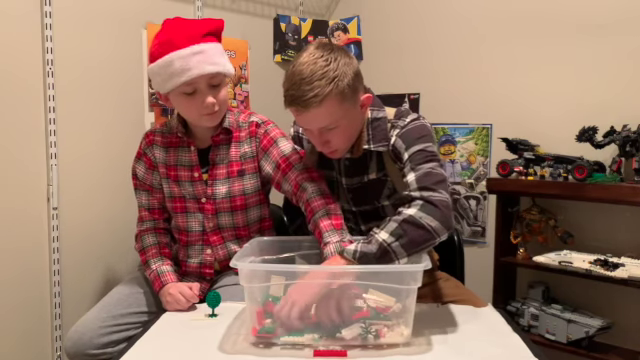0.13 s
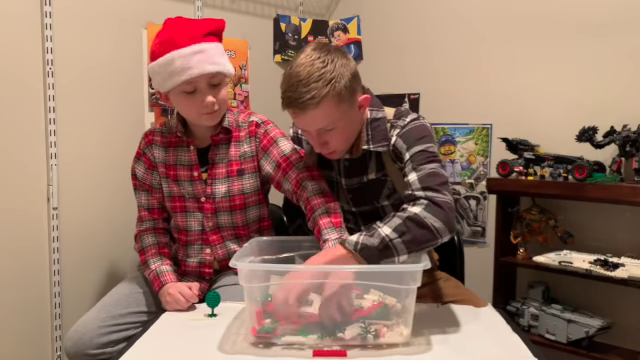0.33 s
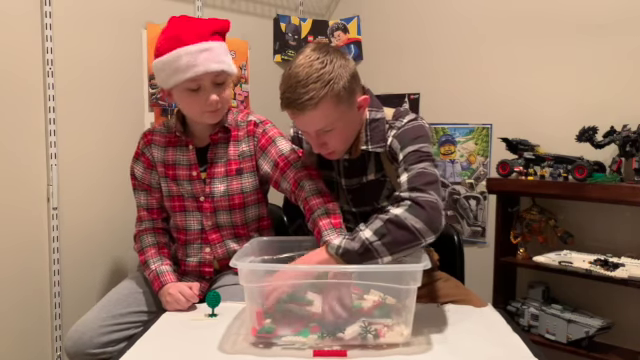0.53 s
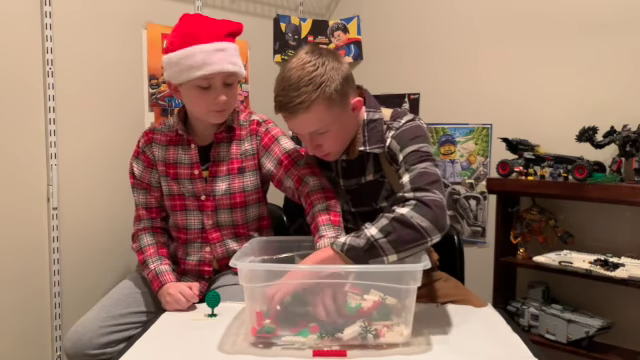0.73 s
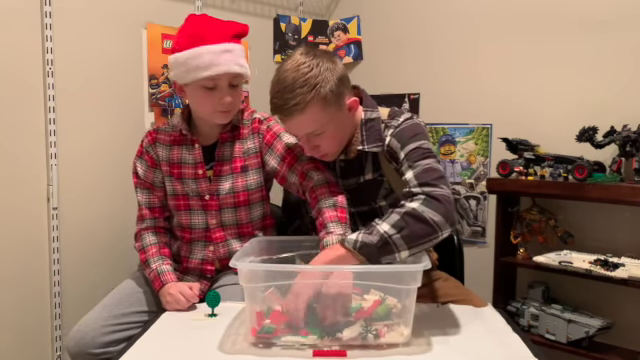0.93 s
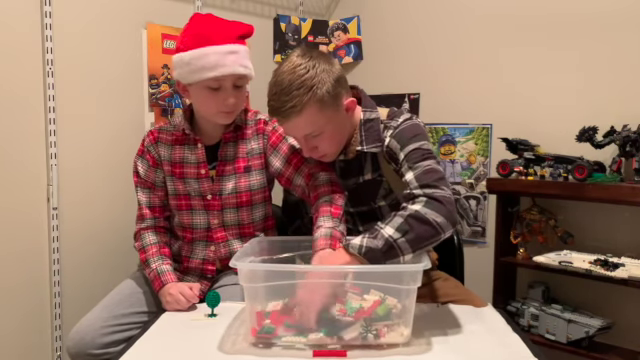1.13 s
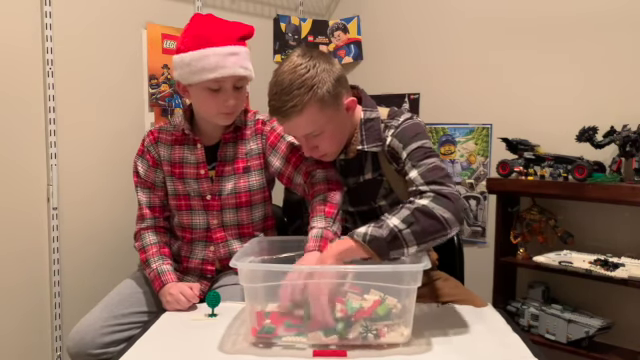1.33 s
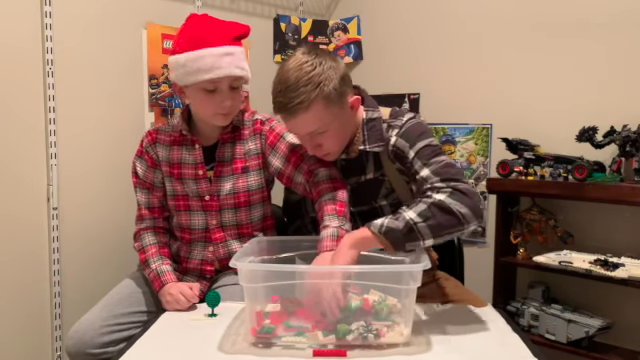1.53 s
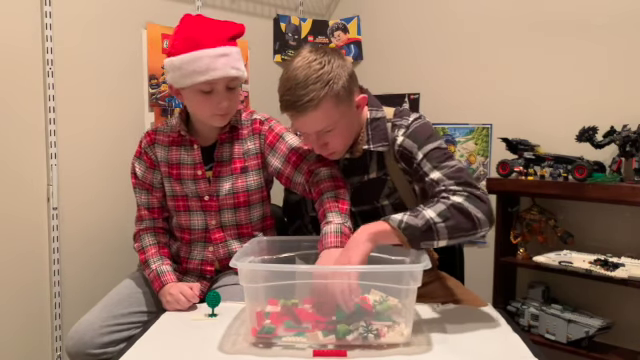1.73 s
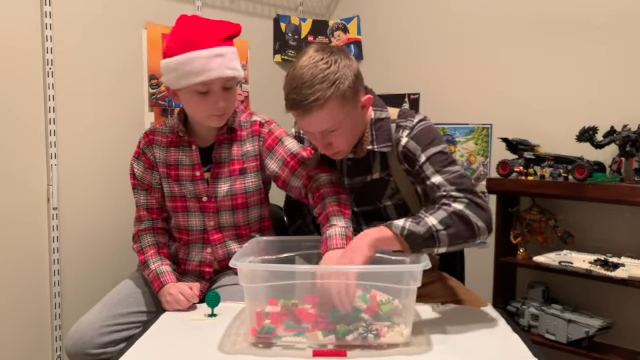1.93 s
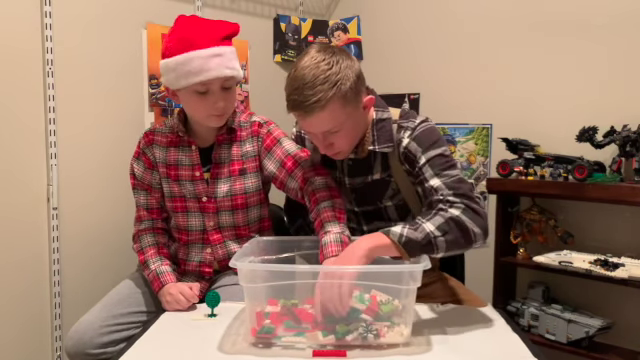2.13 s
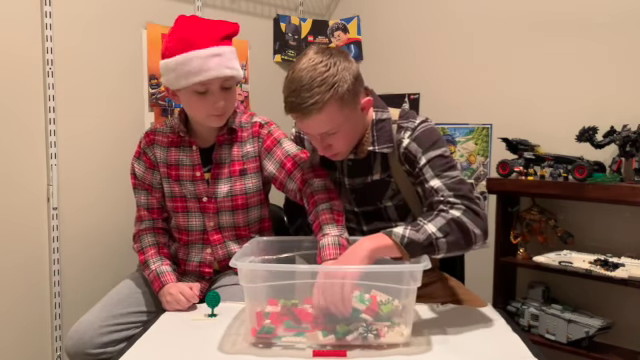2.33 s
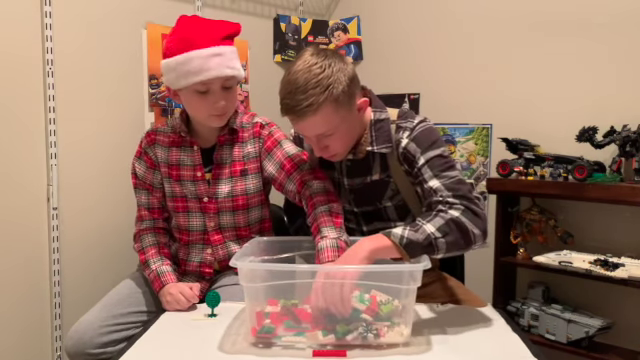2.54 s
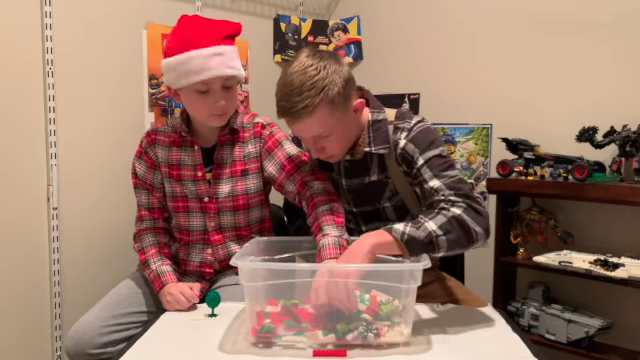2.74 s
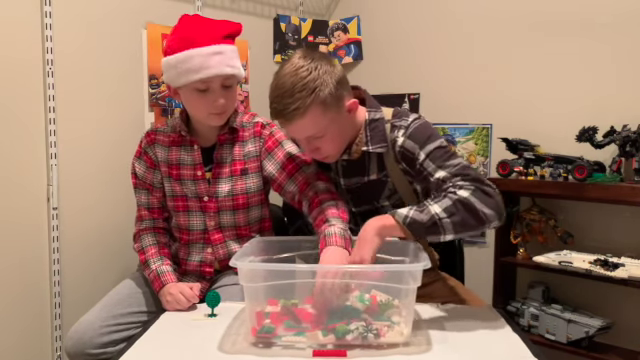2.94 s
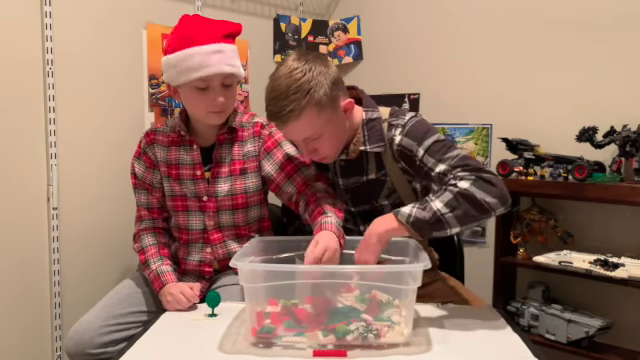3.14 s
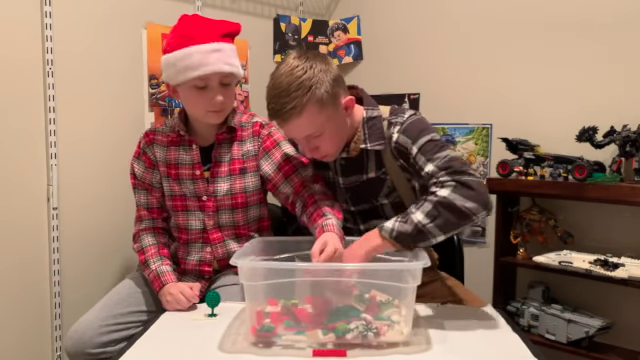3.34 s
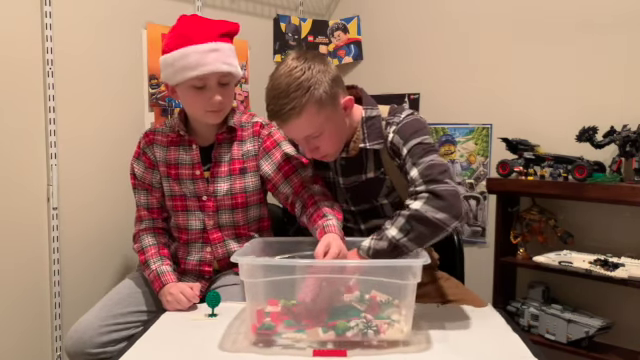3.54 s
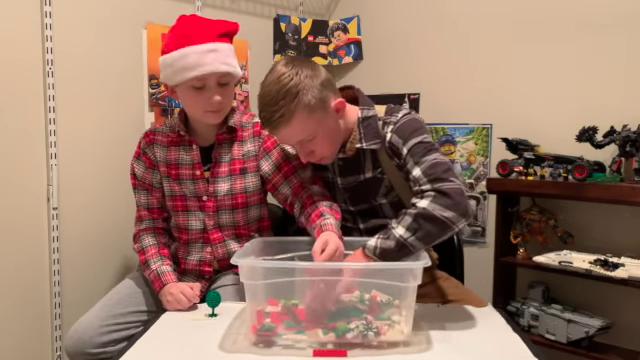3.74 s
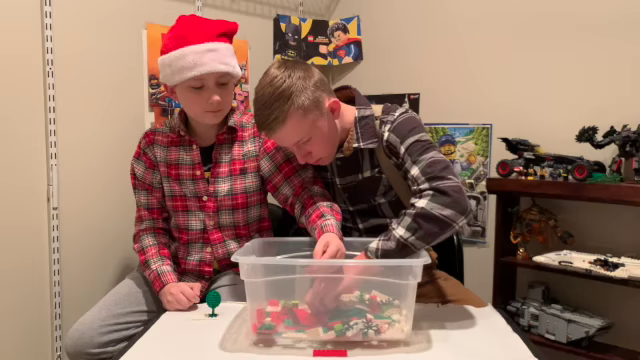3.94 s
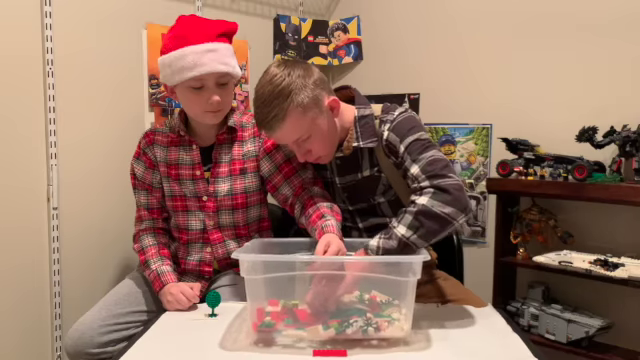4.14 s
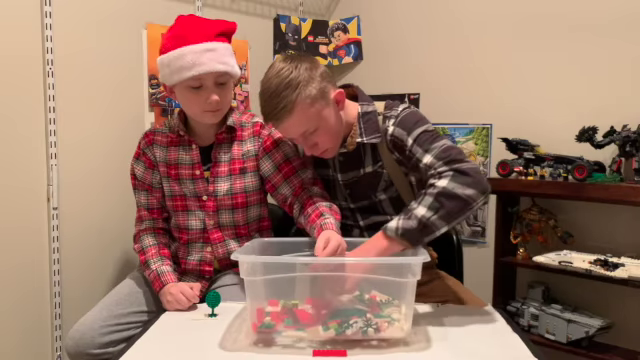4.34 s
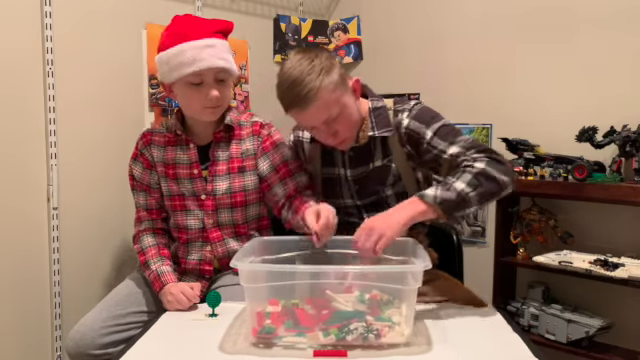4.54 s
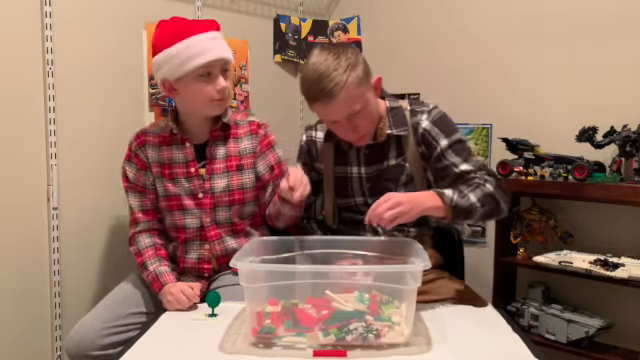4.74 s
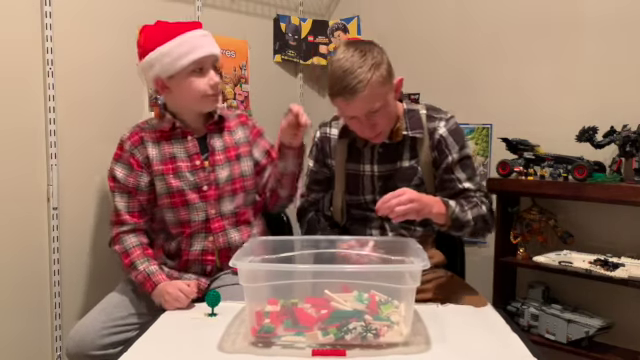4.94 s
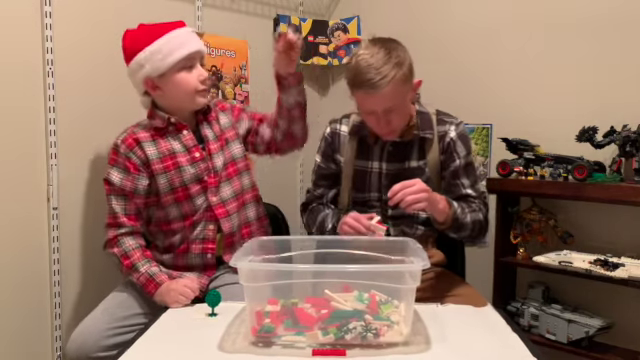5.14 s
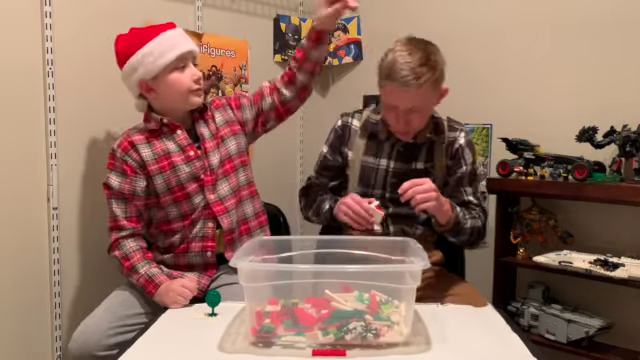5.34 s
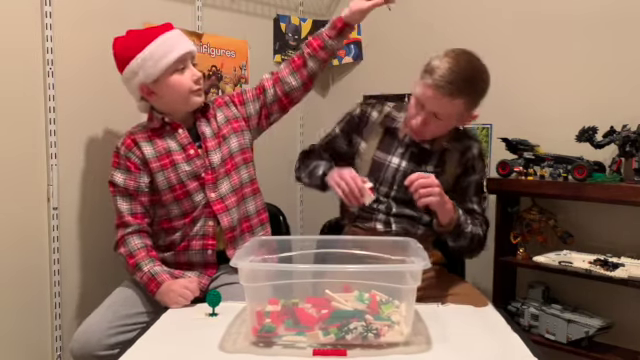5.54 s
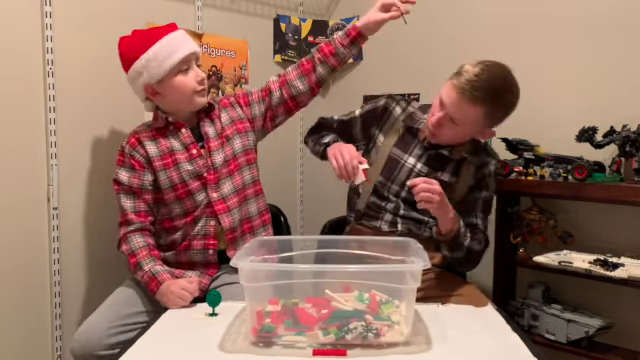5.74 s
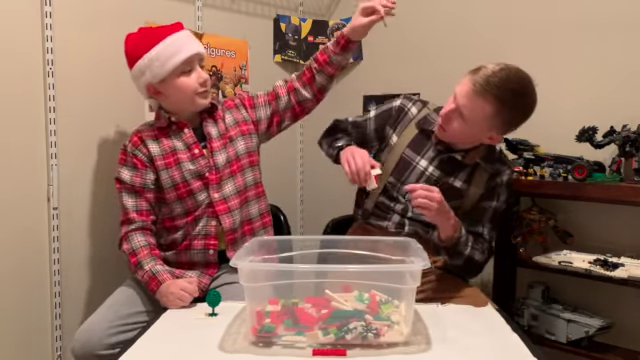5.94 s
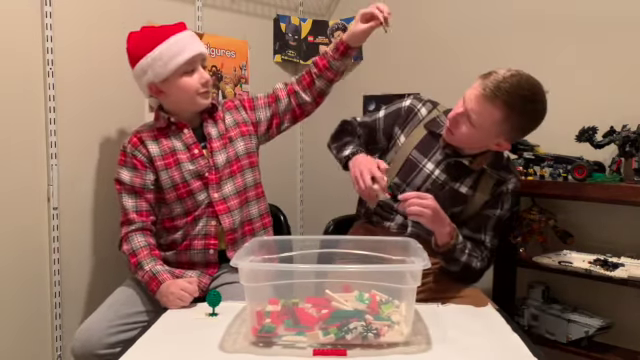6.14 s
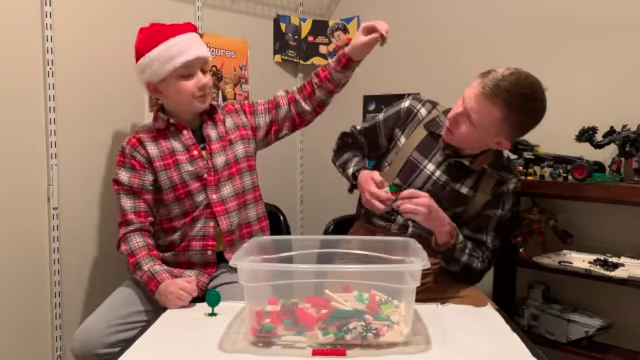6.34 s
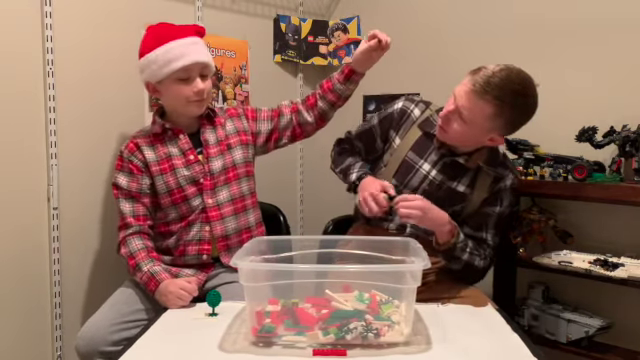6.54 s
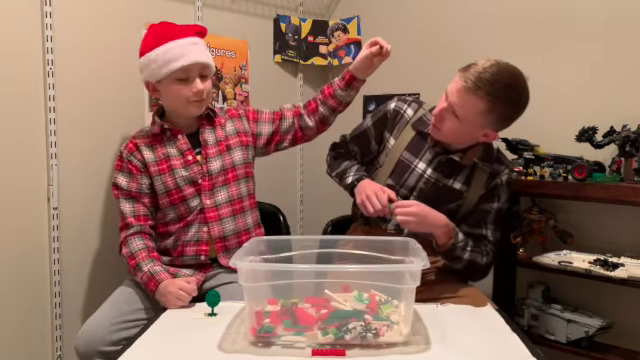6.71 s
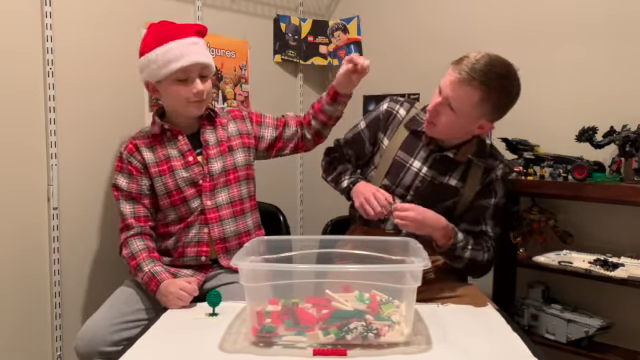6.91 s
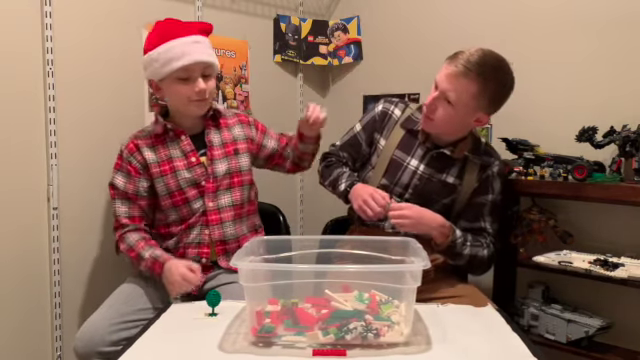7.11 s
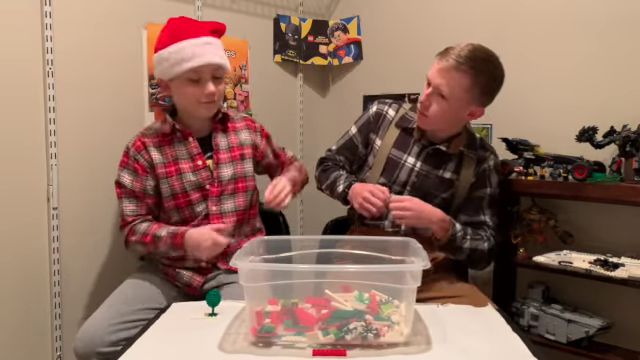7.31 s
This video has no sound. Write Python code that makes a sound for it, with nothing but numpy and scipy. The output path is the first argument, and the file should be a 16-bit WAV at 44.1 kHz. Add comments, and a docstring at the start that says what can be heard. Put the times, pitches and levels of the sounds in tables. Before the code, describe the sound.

In a small quiet room, close stereo microphones catch hands churning small hard plastic bricks in a hollow bin. Dense bright clatter comes first, with hollow drumming on the bottom, then thins into brief bursts and separate clicks. After about four and a half seconds the rattle stops; dull low bumps, faint cloth rustle, a stuttering creak and one hollow clack remain.

```python
"""Loose plastic bricks tick against each other and drum on a plastic bin, in bursts, in a small room.
Two hands rummage: showers of random contacts ring the bin's panels and the bricks, and listed knocks stand out.
Dull bumps on furniture sweep down to a boom; later come a stuttering creak of ringing slips, a hollow clack
and short rasps and clicks of filtered grains. Sleeves rustle, weight shifts rumble, and faint noise lies underneath."""
import sys
import numpy as np
from scipy import signal
from scipy.fft import rfft, irfft
from scipy.io import wavfile
from scipy.ndimage import uniform_filter1d

SR = 44100
rng = np.random.default_rng(int(sys.argv[2]) if len(sys.argv) > 2 else 0)


def pcm_store(signal):
    """Save signal as 16-bit PCM."""
    levels = np.round(np.clip(np.atleast_2d(signal), -1, 1) * 32767)
    wavfile.write(sys.argv[1], SR, levels.astype(np.int16).T)


N = 325001


def amp(db):
    """Amplitude factor of a level in dB."""
    return 10 ** (np.asarray(db) / 20)


def evened(x):
    """Scales a sound to RMS 1."""
    return x / np.sqrt(np.mean(x ** 2) + 1e-20)


def unit(x):
    """Scales a response to mean energy 1 per channel."""
    return x / np.sqrt(np.sum(x ** 2) / len(x) + 1e-20)


def read(points, hz):
    """Interpolates a table on a log-frequency axis."""
    f, value = np.transpose(points)
    return np.interp(np.log(hz + 1), np.log(f + 1), value)


def add(mix, s, sound):
    """Mixes a stereo sound in at s seconds."""
    part = mix[:, max(round(s * SR), 0):][:, :sound.shape[1]]
    part += sound[:, :part.shape[1]]


def shaped(x, points):
    """Gives a full-length sound a spectrum."""
    gain = amp(read(points, np.fft.rfftfreq(N, 1 / SR)))
    return irfft(rfft(x) * gain, N)


def coloured(x, points, size=2048):
    """Gives a hit a spectrum by a minimum-phase filter, with nothing ahead of its attack."""
    db = read(points, abs(np.fft.fftfreq(size, 1 / SR)))
    log_gain = np.log(amp(np.maximum(db, -100)))
    taps = np.fft.ifft(np.exp(np.conj(signal.hilbert(log_gain)))).real
    return signal.fftconvolve(x, taps[None], axes=1)[:, :x.shape[1]]


def band(x, lo_hz, hi_hz):
    """Third-order Butterworth band-pass."""
    sos = signal.butter(3, [lo_hz, min(hi_hz, SR / 2.1)], "band", fs=SR, output="sos")
    return signal.sosfilt(sos, x)


def strike(hz, db, t60, ring_db, scatter_db, scatter_t60, size=5000):
    """One contact: a tick, the modes it wakes at that spot, and the jostle of neighbouring parts."""
    t = np.arange(size) / SR
    weights = amp(db) * rng.standard_normal(len(hz))
    ring = weights @ np.sin(2 * np.pi * np.outer(hz, t)) * amp(-60 * t / t60)
    hit = (t == 0) + amp(ring_db) * unit(ring[None])[0]
    # samples; the bin stands a little to the right
    lags = rng.integers(0, 6), rng.integers(0, 2)
    hit = np.array([np.pad(hit, (lag, 0))[:size] for lag in lags])
    scatter = unit(rng.standard_normal((2, size)) * amp(-60 * t / scatter_t60))
    return hit + amp(scatter_db) * scatter


def ringing(modes, scale, t60, rise_s, size=9000):
    """Modes (pitch, dB) at pitch times scale that swell briefly and die away, with energy 1."""
    t = np.arange(size) / SR
    ring = sum(amp(db) * np.sin(2 * np.pi * (scale * pitch * t + rng.random())) for pitch, db in modes)
    envelope = amp(-60 * t / t60) * (1 - np.exp(-t / rise_s))
    return unit((ring * envelope)[None])[0]


def strokes():
    """The hands' force over time, with the power-weighted bottom weight and brightness of the strokes (dB)."""
    # Strokes of a hand through the bricks. Each row: start in seconds, length in seconds, mid-stroke force in dB,
    # swell over the stroke in dB, weight on the bottom in relative dB, brick-on-brick brightness in relative dB.
    stroke_rows = [(-.02, 0.13, -32, -9, -4.5, 0), (0.099, 0.18, -34, -4, -4.5, -2.5),
                   (0.328, 0.059, -48, 5.5, 11, -5), (0.384, 0.092, -39, 18, -4.5, -1),
                   (0.463, 0.082, -32.5, 10, -8, 0), (0.554, 0.14, -28.5, 0.5, -4, -0.5),
                   (0.695, 0.14, -32, -2.5, -1.5, -0.5), (0.855, 0.15, -39.5, 6.5, -1.5, -2),
                   (0.955, 0.25, -38.5, 1.5, -0.5, 0.5), (1.222, 0.2, -42, 5, 2.5, 2.5),
                   (1.303, 0.24, -33, 6, -2.5, 1), (1.57, 0.068, -41, -11, 7, 0.5),
                   (1.637, 0.34, -36, -8.5, -2, 0), (2.117, 0.059, -41.5, 1, -2.5, -3),
                   (2.334, 0.074, -61.5, -5, 1, -18), (2.407, 0.069, -52.5, -16, 0.5, -4.5),
                   (2.49, 0.046, -44, -2.5, -6, -5.5), (2.583, 0.081, -44, -9.5, -3, -3.5),
                   (2.705, 0.056, -62.5, -6, 10, -9), (2.787, 0.034, -55, -5, -8, -11),
                   (2.894, 0.017, -67, -2.5, -8, 0), (3.428, 0.23, -42, 5.5, -4.5, -2),
                   (3.621, 0.19, -44, -4, -0.5, -2.5), (3.802, 0.034, -47, 6, 3, 2),
                   (3.878, 0.15, -50.5, -14.5, -2.5, -8), (4.029, 0.095, -50, 2.5, -7.5, -4),
                   (4.288, 0.093, -52.5, -5.5, -23, -14), (4.349, 0.053, -42, 2, 0.5, -4),
                   (4.459, 0.044, -55, 8, 4.5, -8.5), (4.534, 0.035, -59, -11, 12, -2)]
    rise_s, settle_db_per_s = 0.011, 332.5
    t = np.arange(0, N, 32) / SR
    powers = []
    for start, length, force, swell, _, _ in stroke_rows:
        age = t - start
        db = force + swell * (np.clip(age / length, 0, 1) - .5)
        db = db - settle_db_per_s * np.maximum(age - length, 0)
        powers.append((np.clip(age / rise_s, 0, 1) * amp(db)) ** 2)
    total = np.sum(powers, 0) + 1e-20
    weight, bright = np.array(stroke_rows)[:, 4:].T @ np.array(powers) / total
    curves = 10 * np.log10(total), weight, bright
    return [np.interp(np.arange(N) / SR, t, curve) for curve in curves]


def contact(shell_scatter_db, brick_scatter_db, brick_ring_db, detune=0.037, colour_db=3.0):
    """How the bin's walls, its bottom and the low and high modes of one small brick answer a contact."""
    # Modes of the bin's panels before detuning. Each row: frequency in Hz, level in relative dB.
    bin_modes = [(312, -8.5), (395, 5.5), (452, 4.5), (544, 2), (653, 0.5), (833, -1.5), (892, -7),
                 (988, -9.5), (1092, -19), (1425, 7), (1616, -3), (1913, 4), (2286, -2.5)]
    # Mean spectrum of the filled bin. Each row: frequency in Hz, level in relative dB.
    clatter = [(60, -22.5), (150, -14), (200, -16), (250, -8.5), (335, -9), (400, -1.5), (452, 3),
               (495, -4), (544, 1.5), (600, -3), (652, -2), (730, -4), (850, -0.5), (1450, 0.5),
               (2200, -4.5), (3200, -16.5), (5600, -23.5), (8300, -18.5), (12000, -21), (15800, -26)]
    hz, db = np.transpose(bin_modes)
    hz = hz * (1 + detune * rng.standard_normal(len(hz)))  # the shifting load retunes the panels
    shell = strike(hz, db, t60=.05, ring_db=-18, scatter_db=shell_scatter_db, scatter_t60=.035)
    brick_hz = rng.uniform(3800, 13000, size=9)
    brick = strike(brick_hz, np.zeros(len(brick_hz)), t60=.04, ring_db=brick_ring_db,
                   scatter_db=brick_scatter_db, scatter_t60=.045)
    # no two bricks are alike
    colour = [(f, level + colour_db * rng.standard_normal()) for f, level in clatter]
    shell, brick = coloured(shell, colour), coloured(brick, colour)
    walls, bottom = band(shell, 660, 3200), band(shell, 63, 660)
    low, high = band(brick, 2800, 7000), band(brick, 7000, 19000)
    return np.array([unit(part) for part in (walls, bottom, low, high)])


def rummage(wall_db=-4, bottom_db=-4, brick_db=-6, tick_db=-6.5, variety_db=4.0, tick_growth=2.1):
    """A shower of contacts of uneven size, denser as the hands push harder."""
    contacts_per_s, spots, size_spread_db = 560, 110, 4.0  # the rate holds at -35.5 dB force
    t, out = np.arange(N) / SR, np.zeros((2, N))
    force, weight, bright = strokes()
    rate = contacts_per_s * np.clip(amp(.4 * (force + 35.5)), .4, 2)
    sizes = amp(size_spread_db * np.minimum(rng.exponential(1, N), 4)) * (rng.random(N) < rate / SR)
    # the hand's effort is shared among the contacts of each moment
    crowd = abs(uniform_filter1d(sizes ** 2, size=2000))
    sizes = sizes / np.sqrt(crowd + 0.00097) * amp(force)
    spot = rng.integers(0, spots, N)
    shares = variety_db * rng.uniform(-1.1, 1, (N, 4))  # some contacts favour the bin, others the bricks
    answers = [contact(shell_scatter_db=-1.5, brick_scatter_db=2, brick_ring_db=1) for _ in range(spots)]
    for i in np.flatnonzero((sizes > 0) & (force > -80)):
        part_db = np.array([wall_db, bottom_db + weight[i], brick_db + bright[i],
                            tick_db + tick_growth * bright[i]])
        hit = np.tensordot(amp(part_db + shares[i]), answers[spot[i]], 1)
        add(out, t[i], sizes[i] * hit)
    return out


def clacks(level_db=19, spread_db=0.5):
    """Larger pieces collide among the small ones: each a short hard click at a pitch of its own."""
    # Modes of a loose plate or large brick. Each row: multiple of its lowest mode, level in relative dB.
    piece_modes = [(1, 2), (1.27, -3), (1.55, -3), (1.9, -4.5), (2.4, -11), (3.1, -13.5), (3.9, -13.5)]
    low_hz, high_hz, clacks_per_s = 790, 2594, 75  # lowest mode of the largest and smallest pieces
    out, force = np.zeros((2, N)), strokes()[0]
    for i in np.flatnonzero((rng.random(N) < clacks_per_s / SR) & (force > -52)):
        hz = low_hz * (high_hz / low_hz) ** rng.random()
        ring = ringing(piece_modes, hz, t60=.011, rise_s=.00005, size=900)
        sides = rng.uniform(.5, 1.3, (2, 1))
        level = amp(force[i] + level_db + spread_db * min(rng.exponential(), 2))
        add(out, i / SR, sides * level * ring)
    return band(out, 400, 15000)


def knocks(wall_db=26.0, bottom_db=24, brick_db=24.5, tick_db=19.0, slide_db=-2, tick_growth=2.7, size=560):
    """Single contacts that stand out of the rattle: gentle ones slide into place, hard ones strike cleanly."""
    # Bricks that strike the bin or snap. Each row: time in seconds, force in relative dB,
    # weight on the bottom in relative dB, brightness in relative dB.
    knock_rows = [(.021, -39.5, -15, -13.5), (0.069, -30.5, -0.5, -7.5), (0.142, -40, -2, -14.5),
                  (.225, -24.5, -2, -4), (0.267, -31.5, -14, -7.5), (0.422, -42.5, 1.5, -6.5),
                  (0.488, -34, -1, 3.5), (.578, -30.5, -3, -4.5), (.594, -28, 0.5, -9.5),
                  (.602, -27, -2.5, -9), (0.652, -28.5, -8, -4.5), (0.72, -35, -10, -11),
                  (0.729, -25.5, -1.5, -12), (0.78, -29, 3, -16.5), (.97, -38, -3, -4),
                  (1.039, -34.5, -4, -4), (1.075, -53, -5, 8.5), (1.087, -41, -5, -3.5),
                  (1.096, -35.5, -12, -9), (1.13, -40, -3, -5.5), (1.154, -26, -7.5, -4.5),
                  (1.259, -28, -6, -8), (1.293, -36.5, -9, -7.5), (1.314, -36, 4.5, -6),
                  (1.326, -30, 5, -5), (1.359, -37.5, 5, 2), (1.372, -26, -3, -10.5), (1.418, -32, -6, 2),
                  (1.555, -36, -1, -7), (1.676, -36.5, 8.5, -4.5), (1.685, -34, 2, 5), (1.76, -42, 9, -6),
                  (1.892, -31, -11, -10), (1.965, -38, -20, -2), (2.117, -43, -5, -6),
                  (2.13, -50.5, -8, -5), (2.14, -40, -4, -3), (2.405, -52, -3, -18),
                  (2.416, -48.5, -3, -13), (2.487, -47.5, -10, -4), (2.508, -50, 1, -10),
                  (2.55, -44, -1, -25), (2.6, -40.5, -15, -21), (2.619, -38, -4, -6.5),
                  (2.643, -41, -5, -3.5), (2.802, -61, -5, -19), (2.81, -45.5, 2, -11),
                  (2.9, -61.5, -1.5, -2), (3.416, -57, -5, 2), (3.433, -53.5, 8, 4.5),
                  (3.443, -41, 8.5, -5), (3.463, -38.5, 2.5, -7), (3.506, -42, -9, -12),
                  (3.549, -43.5, 5, -5), (3.56, -42, 4, -8), (3.577, -41, -2, 2), (3.628, -36.5, -3, -14.5),
                  (3.644, -35, 5.5, -0.5), (3.658, -36.5, -3, -12), (3.678, -40, 2, -6),
                  (3.73, -43.5, -5, 0.5), (3.775, -38.5, -6, -10), (3.803, -31, -13, -13.5),
                  (3.826, -28, -1.5, -5), (4.035, -56, -5, -13), (4.044, -48.5, 4, -11),
                  (4.054, -36.5, -10, -5), (4.079, -32.5, -13.5, -2), (4.302, -48.5, -6.5, -19),
                  (4.322, -46.5, -11, -26), (4.347, -51, 4, -9), (4.356, -35, -5, -13),
                  (4.484, -51.5, -3, -10), (4.535, -49, 5, -7), (4.723, -66.5, -14, -0.5),
                  (4.895, -65, 4.5, -24), (4.966, -63.5, -9, -0.5), (5.034, -70, -6, 1),
                  (5.643, -58.5, 6, -1.5), (6.012, -64, 11.5, -19)]
    out, lead = np.zeros((2, N)), np.arange(-size, 1) / SR
    for s, force, weight, bright in knock_rows:
        part_db = force + np.array([0, weight, bright, tick_growth * bright])
        part_db = part_db + np.array([wall_db, bottom_db, brick_db, tick_db])
        answer = contact(shell_scatter_db=-5, brick_scatter_db=5, brick_ring_db=-2, detune=.02, colour_db=1.5)
        hit = np.tensordot(amp(part_db), answer, 1)
        slide = unit(rng.standard_normal((1, len(lead))) * np.exp(lead / .004))
        touch = unit((lead == 0) + amp(slide_db - 0.12 * (force + 66.5)) * slide)
        add(out, s + lead[0], signal.fftconvolve(hit, touch, axes=1))
    return out


def drums(body_db=22, rise_s=0.0033):
    """The bottom of the bin answers a push with a short hollow note, which depends on what lies on it."""
    # Bumps by a hand or the whole load. Each row: time in seconds, level in relative dB, note in Hz, t60 in seconds.
    drum_rows = [(.354, -40, 395, .05), (.374, -29, 403, 0.031), (1.315, -30, 445, 0.098),
                 (1.581, -33, 526, 0.087), (1.654, -30, 459, 0.08), (1.764, -25.5, 437.6, 0.27),
                 (1.914, -28, 445, 0.099), (2.675, -45.5, 552, 0.14), (2.735, -54, 559, 0.13),
                 (3.826, -29, 638, 0.056), (4.353, -22.5, 445, 0.038), (4.4, -30.5, 418.6, .1),
                 (4.475, -44, 401, 0.09), (4.534, -33, 500, 0.065)]
    # Modes of the bottom. Each row: multiple of the note, level in relative dB.
    drum_modes = [(.55, -11.5), (1, 0.5), (1.25, -8), (2.3, -17)]
    out = np.zeros((2, N))
    for s, peak, hz, t60 in drum_rows:
        note = ringing(drum_modes, hz, t60, rise_s)
        add(out, s, amp(peak + body_db) * np.tile(note, (2, 1)))
    return out


def bumps(start_hz=430, glide_s=0.0094, knock_db=-3, rattle_db=-12, echo_db=-12, echo_glide_s=0.041,
          boom_rise_s=.03, shudder_db=-8):
    """Bending waves in a board: high ones arrive first and fall to a boom; the far edge's echo falls more slowly."""
    # Dull bumps on the furniture. Each row: time in seconds, knock level in relative dB, boom level in relative dB,
    # boom note before its sag in Hz, boom t60 in seconds.
    bump_rows = [(1.686, -24, -36.5, 172, 0.16), (1.92, -35, -44, 110, 0.23),
                 (4.163, -26.5, -32.5, 116, .12), (4.353, -27, -32, 94.9, 0.094),
                 (4.405, -37, -36, 85, 0.32), (4.817, -37.5, -44.5, 128, 0.27),
                 (5.102, -41, -44.5, 130, 0.17), (6.268, -36.5, -41.5, 140, 0.16),
                 (6.416, -45.5, -51.5, 140, .15), (7.172, -31.5, -41, 125, .16),
                 (7.302, -40, -45, 139.4, 0.34)]
    sag_octaves_per_s = 1.8  # the slowest, lowest waves arrive last
    t, out = np.arange(SR // 2) / SR, np.zeros((2, N))

    def falling(end_hz, glide):
        """A sine that glides from the knock to the sagging boom."""
        hz = end_hz * 2 ** (-sag_octaves_per_s * t) + (start_hz - end_hz) * np.exp(-t / glide)
        return np.sin(2 * np.pi * np.cumsum(hz) / SR)

    for s, peak, boom, end_hz, t60 in bump_rows:
        direct, echo = falling(end_hz, glide_s), falling(end_hz, echo_glide_s)
        front = amp(peak + knock_db - 60 * t / 0.044) * (1 - np.exp(-t / 0.0029))
        tail = amp(boom - 60 * np.maximum(t - boom_rise_s, 0) / t60) * np.minimum(t / boom_rise_s, 1) ** 2
        shudder = evened(band(rng.standard_normal(len(t)), 60, 170))
        rattle = evened(band(rng.standard_normal(len(t)), 180, 580))
        rattle_level = amp(peak + knock_db + rattle_db - 60 * t / 0.49) * (1 - np.exp(-t / 0.0034))
        wave = (front + tail) * direct + tail * (amp(echo_db) * echo + amp(shudder_db) * shudder)
        wave += rattle_level * rattle
        add(out, s, np.array([wave, wave]))
    return out


def creaks(body_db=13, ring_db=15, ring_t60=0.028, ring_rise_s=0.0029):
    """A joint sticks and slips in a stutter; each slip is a dull knock that sets the frame ringing."""
    # Slips. Each row: time in seconds, level in relative dB, edge in dB relative to that level.
    slip_rows = [(4.746, -50, 2), (5.314, -50, 5.5), (5.553, -53.5, 10), (5.604, -50.5, 12),
                 (5.642, -40.5, 8), (5.692, -40, 6.5), (5.743, -42, 9), (5.799, -39.5, 4.5),
                 (5.891, -46.5, -3), (5.902, -42, -3), (6.01, -45, 10.5), (6.058, -43, 5),
                 (6.979, -42, 10.5), (7.049, -46, 5), (7.058, -45, -3.5), (7.109, -43, -2.5),
                 (7.158, -38, 1), (7.236, -42, 1), (7.286, -45, 0.5), (7.308, -42, 4), (7.355, -43, 6)]
    # Spectrum of a slip. Each row: frequency in Hz, level in relative dB.
    slip_colour = [(59, -29), (100, 0), (167, -10), (241, 0), (540, -16), (592, -17.5), (903, -5.5),
                   (2140, -14.5), (2810, -29), (8000, -52), (10400, -48), (17600, -120)]
    # Frame modes before a random retuning. Each row: frequency in Hz, level in relative dB.
    frame_modes = [(390, 2.5), (545, 2.5), (660, -5.5), (1080, -19)]
    out = np.zeros((2, N))
    for s, peak, edge in slip_rows:
        slip = strike(np.array([380, 540, 620]), np.zeros(3), t60=0.029, ring_db=-13.5,
                      scatter_db=9.5, scatter_t60=0.041)
        slip = coloured(slip, slip_colour)
        body = amp(peak + body_db) * unit(band(slip, 84, 476))
        add(out, s, body + amp(peak + edge) * unit(band(slip, 450, 5300)))
        ring = ringing(frame_modes, rng.uniform(.93, 1.07), ring_t60, ring_rise_s)
        add(out, s, amp(peak + ring_db) * np.tile(ring, (2, 1)))
    return out


def clack(level_db=-47, rise_s=0.0029, rasp_db=-13, rasp_t60=.09):
    """A hollow piece of furniture, knocked once, rings and rasps briefly."""
    # Its modes. Each row: frequency in Hz, level in relative dB, t60 in seconds.
    hollow_modes = [(364, 13, 0.064), (568, -3.5, 0.062), (1007, -1, 0.076), (1240, -2, 0.048),
                    (1670, -5.5, 0.055), (1870, -12, 0.05), (2780, -21, 0.06), (3300, -23, 0.06),
                    (3838, -22, 0.07)]
    clack_s = 6.266
    t, out = np.arange(SR // 3) / SR, np.zeros((2, N))
    ring = sum(amp(db - 60 * t / t60) * np.sin(2 * np.pi * (hz * t + rng.random()))
               for hz, db, t60 in hollow_modes)
    rasp = evened(band(rng.standard_normal((2, len(t))), 500, 2000))
    rasp = amp(rasp_db - 60 * t / rasp_t60) * rasp
    add(out, clack_s, amp(level_db) * (1 - np.exp(-t / rise_s)) * (ring + rasp))
    return out


def scrapes(grain_db=3, slips_per_s=3000):
    """Short rasps and small clicks, some at the start of the clack or among the slips: blurred tiny grains."""
    # Each row: start in seconds, length in seconds, level before the envelope in relative dB,
    # lower band edge in Hz, upper band edge in Hz.
    scrape_rows = [(3.118, 0.023, -64, 1085, 1504), (5.89, 0.021, -66, 4890, 6830),
                   (6.01, 0.042, -68, 2300, 4030), (6.253, 0.03, -57, 2660, 3900),
                   (6.306, 0.095, -81.5, 3400, 4750), (6.909, 0.052, -61, 6900, 14750),
                   (6.902, 0.026, -52.5, 350, 1960), (6.983, 0.014, -57, 800, 2400),
                   (7.16, 0.035, -60.5, 692, 1800)]
    out, t = np.zeros((2, N)), np.arange(SR // 8) / SR
    for s, length, db, lo_hz, hi_hz in scrape_rows:
        slips = rng.standard_normal((2, len(t))) * amp(grain_db * rng.exponential(1, len(t)))
        slips = slips * (rng.random(len(t)) < slips_per_s / SR)
        envelope = (1 - np.exp(-t / 0.017)) * np.exp(-(t / length) ** 4)
        add(out, s, amp(db) * evened(band(slips, lo_hz, hi_hz)) * envelope)
    return out


def swells(moves):
    """Each movement of the body swells and fades in one arch."""
    t = np.arange(N) / SR
    return sum(amp(db) * np.sin(np.pi * np.clip((t - start) / length, 0, 1)) for start, length, db in moves)


def handling(rustle_db=-4, rumble_db=-5, grain_db=-1.0, grains_per_s=4000):
    """Soft grainy rustle of sleeves and fingers, and the low rumble of shifting weight in the furniture."""
    # Spectra of rustle and rumble. Each row: frequency in Hz, level in relative dB.
    rustle_colour = [(200, 2), (600, 14), (1500, 7), (4000, 1.5), (7000, -8), (14000, -14)]
    rumble_colour = [(20, -57), (55, 5.5), (100, 6.5), (140, -2.5), (220, -11), (600, -46)]
    # Sleeve brushes and weight shifts. Each row: start in seconds, length in seconds, level in relative dB.
    brushes = [(3.26, 0.16, -72), (4.71, 0.15, -60.5), (4.94, 0.19, -61), (5.61, 0.15, -56.5),
               (5.98, 0.093, -70.5), (6.27, 0.23, -66), (6.89, 0.11, -63.5)]
    weight_shifts = [(1.75, 0.43, -44.5), (3.12, 0.27, -67.5), (4.36, 0.3, -49), (4.8, 0.17, -59),
                     (5.02, 0.24, -60), (5.42, 0.44, -52.5), (5.84, 0.3, -54.5), (6.7, 0.14, -61),
                     (7.02, 0.33, -50)]
    grains = rng.standard_normal((2, N)) * amp(grain_db * rng.exponential(1, N))
    grains = grains * (rng.random(N) < grains_per_s / SR)
    cloth = evened(shaped(grains, rustle_colour)) * amp(rustle_db) * swells(brushes)
    rumble = evened(shaped(rng.standard_normal(N), rumble_colour)) * amp(rumble_db) * swells(weight_shifts)
    return cloth + rumble


def background(level_db=-68.5):
    """Steady stereo noise of the quiet room."""
    # Its spectrum. Each row: frequency in Hz, level in relative dB.
    quiet_colour = [(15, -37), (25, -5.5), (86, 1), (188, -17), (378, -17.5), (703, -27), (782, -23),
                    (895, -28.5), (1270, -29), (5880, -36), (10900, -30), (14300, -35.5), (15500, -42.5)]
    return amp(level_db) * evened(shaped(rng.standard_normal((2, N)), quiet_colour))


def room(x, gap_s=0.0025, size=20000, count=3, half_turns_per_s=3.1):
    """Close walls: sparse reflections, each band dying at its own speed, in a turning blend of reverb tails."""
    # Decay of the room. Each row: frequency in Hz, t60 in seconds.
    room_t60 = [(100, 0.6), (400, 0.24), (1000, 0.23), (2800, 0.26), (7000, 0.21), (14000, 0.06)]
    # the tails take turns, which keeps the reverb even
    out, turn = np.zeros((2, N)), np.arange(N) / SR * half_turns_per_s
    for k in range(count):
        taps = rng.choice([-1., 1.], (2, size)) * (rng.random((2, size)) < 3000 / SR)
        taps = taps * (np.arange(size) > gap_s * SR)
        hz, t, z = signal.stft(taps, SR, nperseg=256)
        decay = amp(-60 * t / read(room_t60, hz)[:, None])
        tail = signal.istft(z * decay, SR, nperseg=256)[1]
        share = np.sqrt(2 / count) * np.cos(np.pi * (turn + k / count))
        out += signal.fftconvolve(x * share, unit(tail), axes=1)[:, :N]
    return out


def scene():
    """The bin, the furniture and the hands in a quiet small room."""
    rattle = rummage() + clacks()
    hits = knocks() + scrapes()
    furniture = creaks() + clack()
    thuds = bumps() + drums()
    wet = room(rattle + amp(-2.5) * hits + amp(-0.5) * furniture + amp(-16.5) * thuds)
    return rattle + hits + furniture + thuds + wet + handling() + background()


def record(dry):
    """Two close microphones: wide in the middle range, near mono in bass and top; then the band limit."""
    # Stereo width. Each row: frequency in Hz, gain of the side signal in dB.
    side_gain = [(60, -14), (250, -8.5), (500, -4.5), (1000, -1), (4500, 1), (7500, -1.5), (10000, -18),
                 (13000, -29.5)]
    edge_hz = 15850
    mid = (dry[0] + dry[1]) / 2
    side = shaped((dry[0] - dry[1]) / 2, side_gain)
    lowpass = signal.firwin(511, edge_hz, window=("kaiser", 9), fs=SR)
    return signal.oaconvolve(np.array([mid + side, mid - side]), lowpass[None], "same")


dry = scene()
out = record(dry)
pcm_store(out)
```